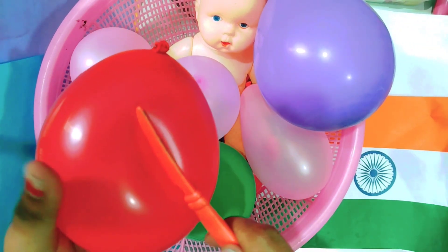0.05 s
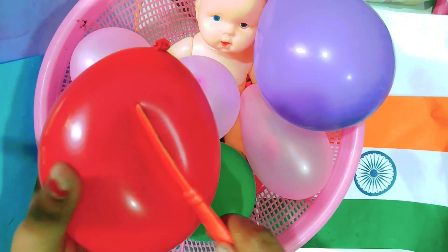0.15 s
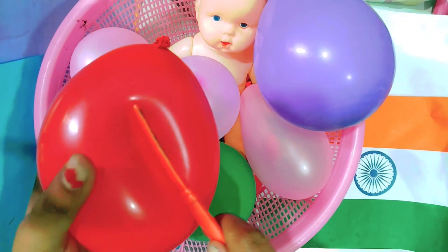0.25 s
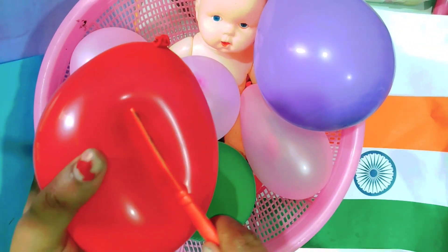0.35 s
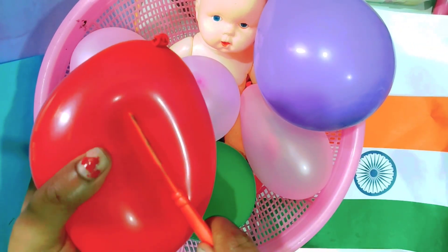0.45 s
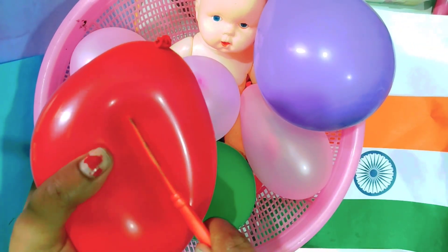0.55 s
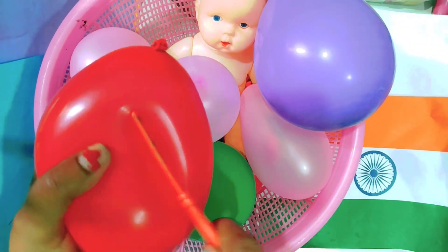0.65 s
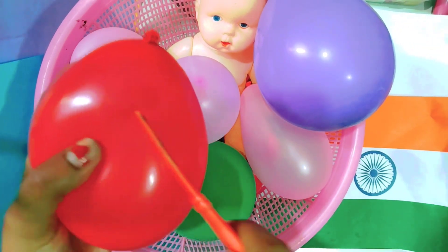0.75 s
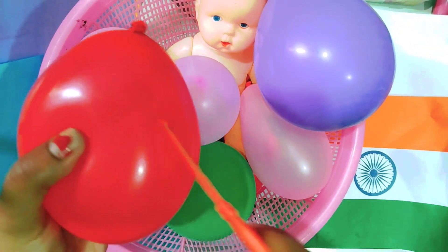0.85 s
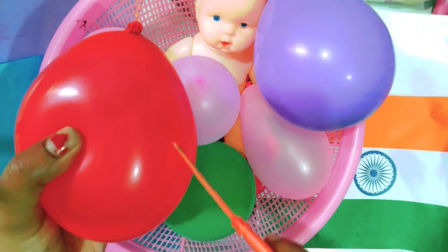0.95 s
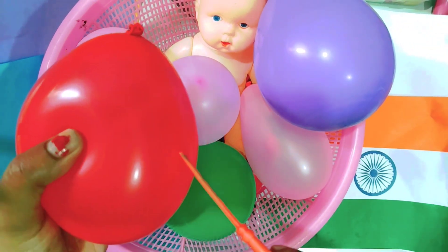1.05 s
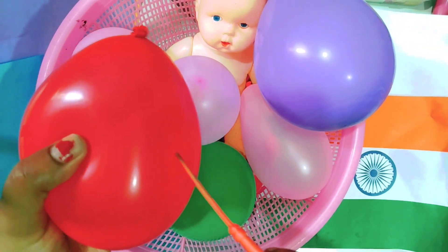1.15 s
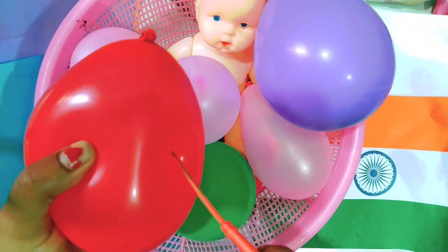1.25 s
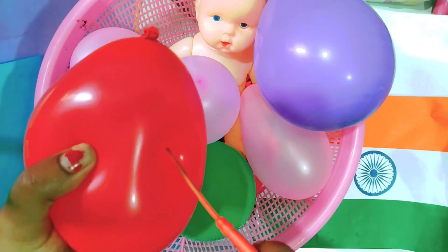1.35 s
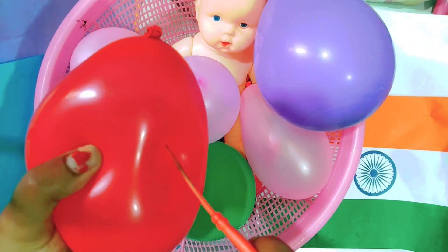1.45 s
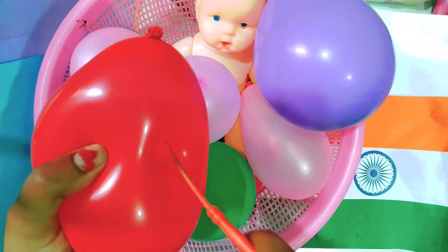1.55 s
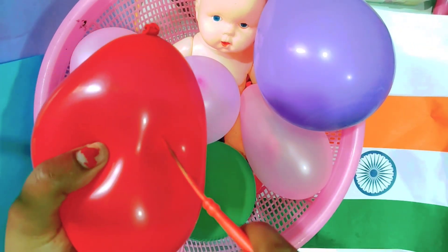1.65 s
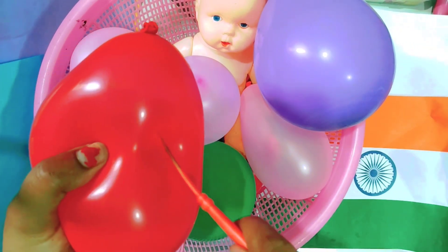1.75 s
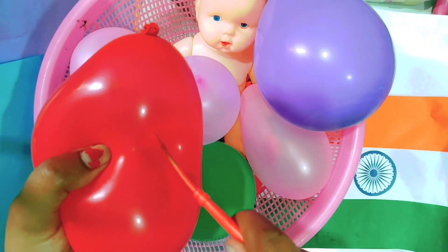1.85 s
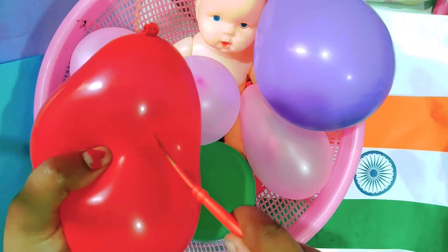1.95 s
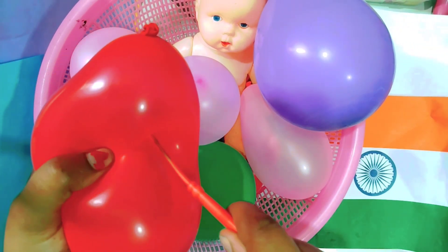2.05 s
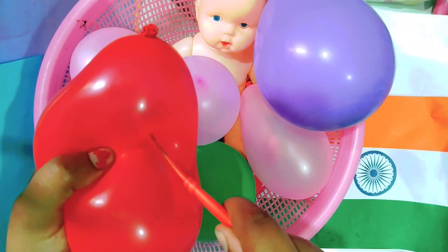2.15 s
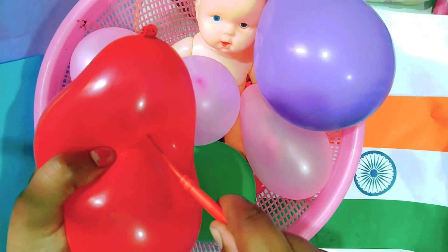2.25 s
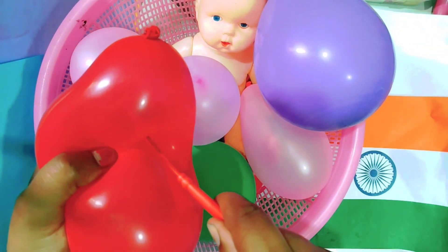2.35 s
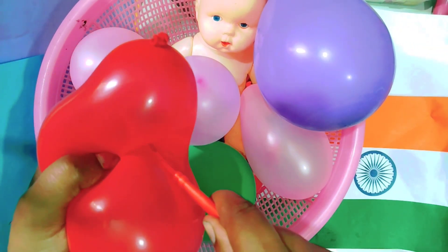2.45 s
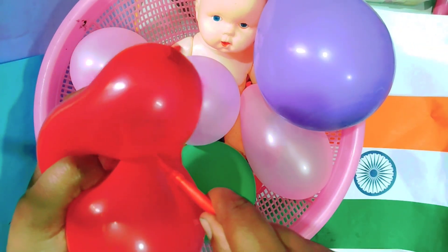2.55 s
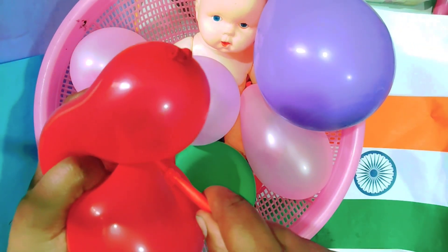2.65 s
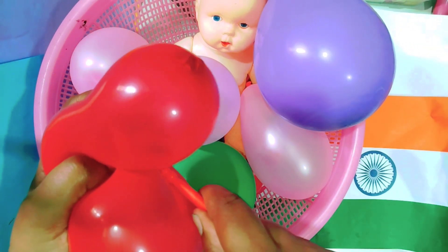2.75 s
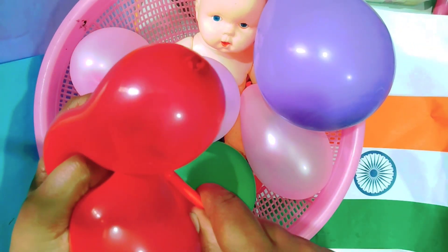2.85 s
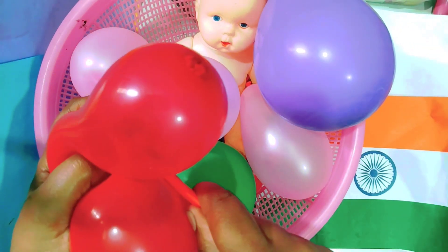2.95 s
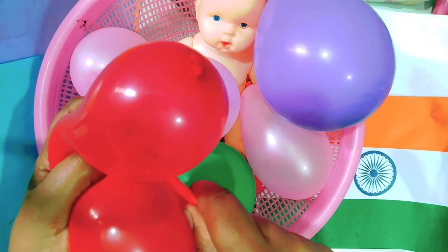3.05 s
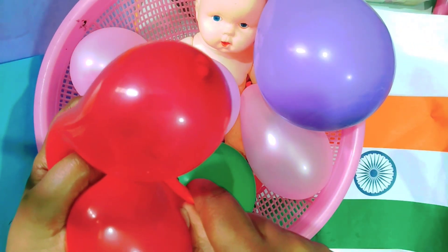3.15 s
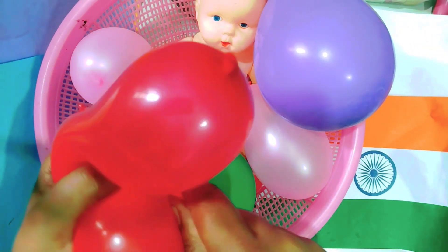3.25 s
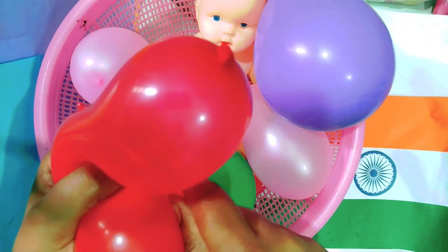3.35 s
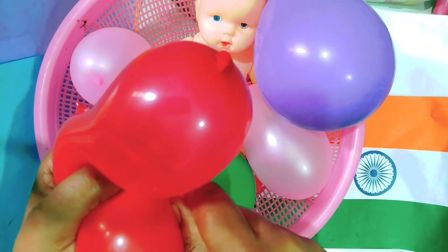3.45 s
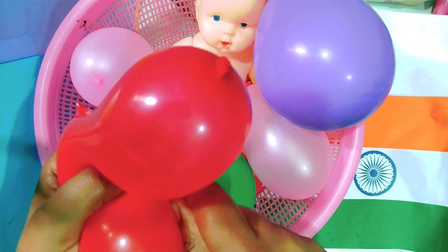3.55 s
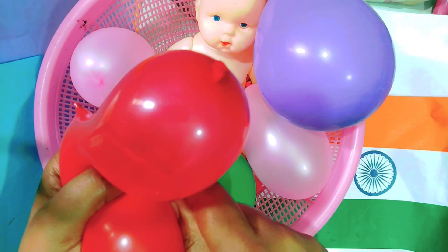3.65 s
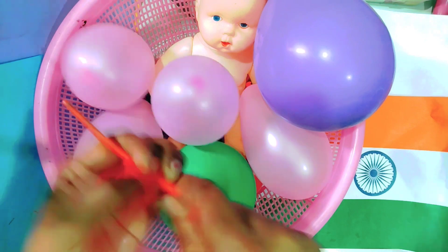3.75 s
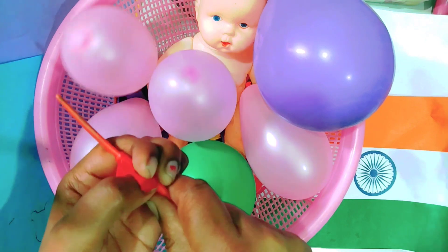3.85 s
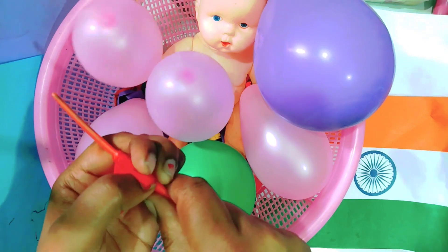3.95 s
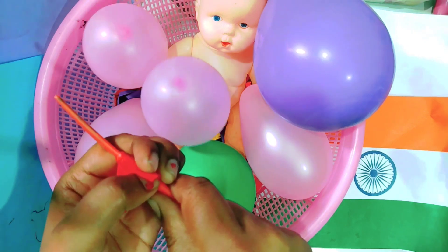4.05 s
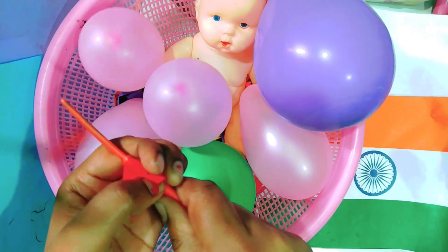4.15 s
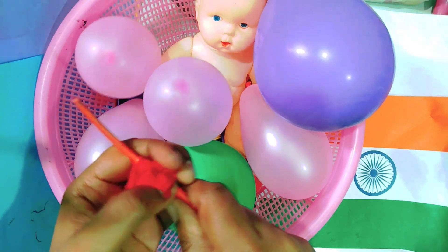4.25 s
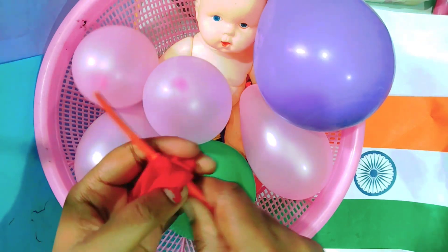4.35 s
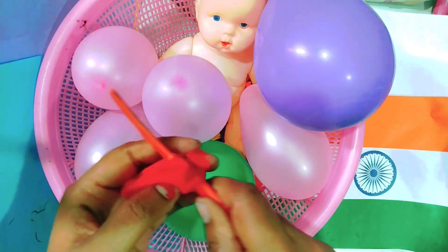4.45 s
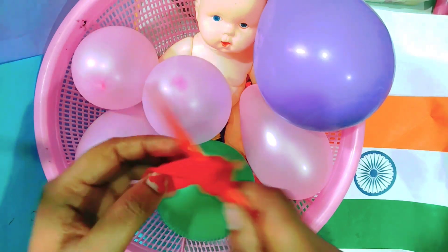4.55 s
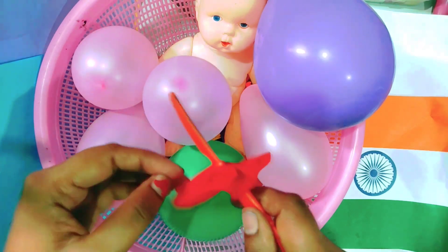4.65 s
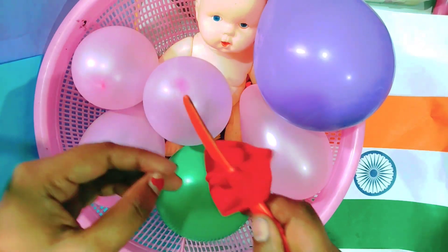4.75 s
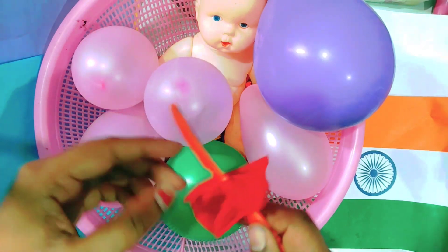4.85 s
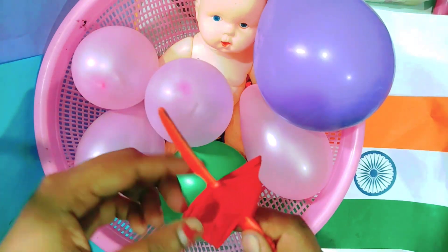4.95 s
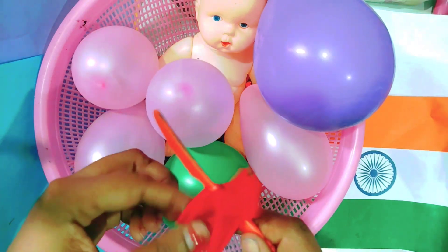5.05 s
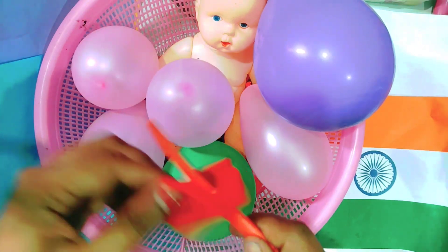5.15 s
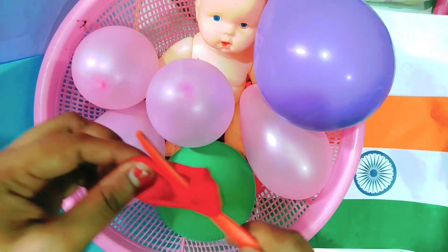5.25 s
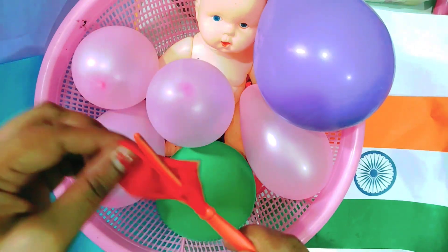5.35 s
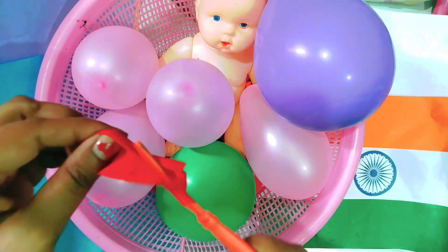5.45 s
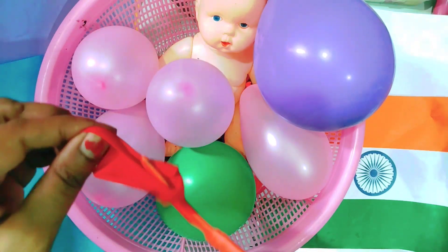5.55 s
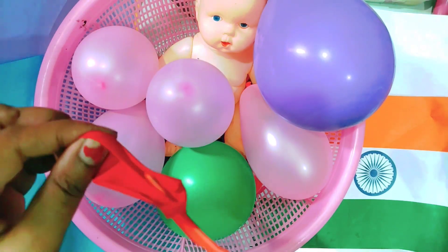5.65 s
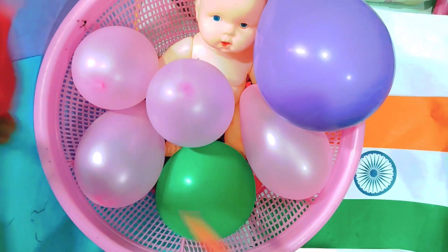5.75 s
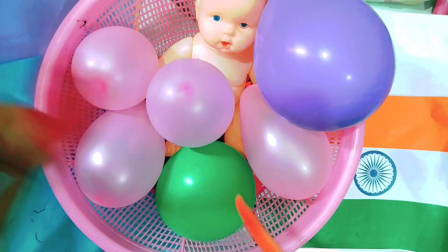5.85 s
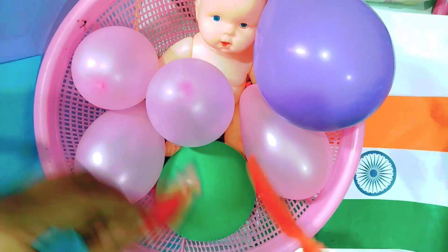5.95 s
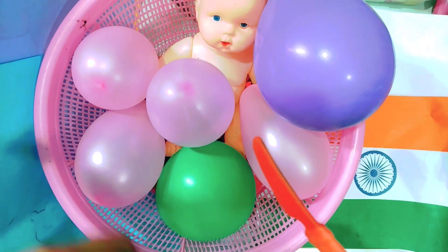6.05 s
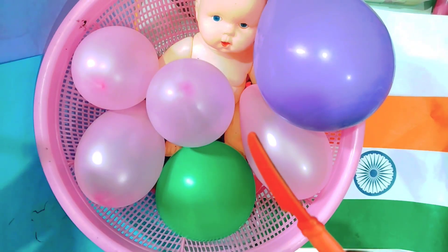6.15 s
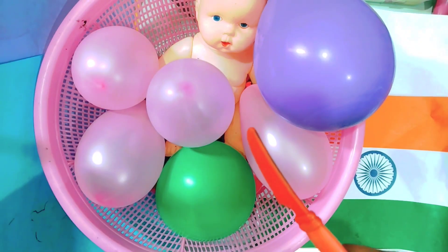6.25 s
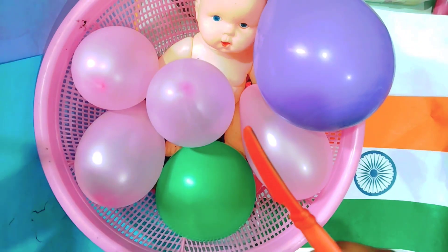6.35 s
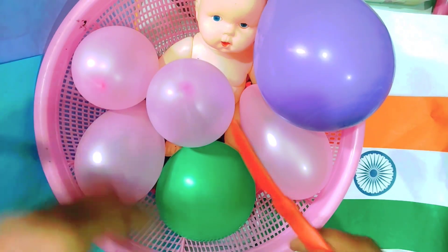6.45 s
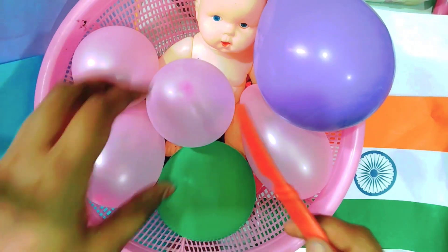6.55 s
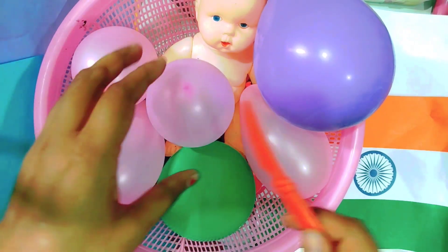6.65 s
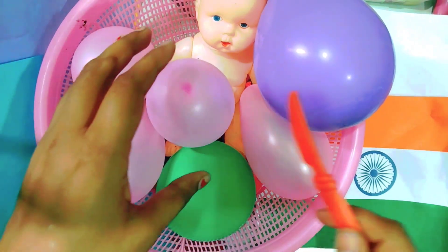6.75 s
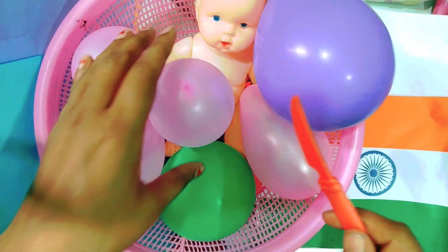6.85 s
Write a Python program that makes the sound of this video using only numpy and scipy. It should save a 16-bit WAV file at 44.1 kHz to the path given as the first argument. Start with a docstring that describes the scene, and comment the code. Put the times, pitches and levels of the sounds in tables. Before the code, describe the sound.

A squeezed rubber balloon creaks and squeaks, is punctured with a sharp crack, hisses for half a second and bursts loudly, then rubber snaps.

```python
"""A squeezed rubber balloon creaks under fingers and a plastic knife, is punctured, hisses and bursts close to a phone.
Creaks are swelling drum notes with plucked skin modes, cracks are coloured noise bursts that ring air and room,
and the leak is shaped noise. The torn rubber then snaps off the blade; hands rub the rubber as grainy noise.
Behind it a wall clock ticks by rattling its case, the room rumbles and faint fluttering tones drift in from far away."""
import sys
import numpy as np
from scipy import signal
from scipy.fft import rfft, irfft, next_fast_len
from scipy.io import wavfile
from scipy.ndimage import uniform_filter1d, map_coordinates

SR = 44100
rng = np.random.default_rng(int(sys.argv[2]) if len(sys.argv) > 2 else 0)


def dump(signal):
    """Clip the signal to [-1, 1] and save it as 16-bit WAV at the path in sys.argv[1]."""
    limited = np.clip(np.atleast_2d(signal).T, -1, 1)
    pcm = np.round(limited * 32767).astype(np.int16)
    wavfile.write(sys.argv[1], SR, pcm)


N = 304738

# Levels are settings ahead of the trims in the functions; spectra are relative, since their noise is levelled later.

# Rumble and house drone over time: (time [s], rumble level [dB], drone level [dB])
AIR_LEVELS = [(0, -53, -44), (.25, -63, -63.5), (.75, -67, -55), (.95, -58, -56), (1.35, -56, -60),
              (1.7, -61.5, -63.5), (2.4, -58.5, -60.5), (2.7, -59.5, -53), (3.3, -68, -45.5),
              (3.6, -78, -62.5), (3.8, -66.5, -85.5), (4.3, -63, -72.5), (4.55, -64.5, -74.5),
              (4.95, -58.5, -76), (5.65, -67.5, -65.5), (6.1, -54.5, -77.5), (6.35, -65.5, -71.5),
              (6.91, -66, -70)]
# Noise spectra of rumble, drone and microphone hiss: (frequency [Hz], relative level per Hz [dB])
RUMBLE_SPECTRUM = [(12, -38.5), (20, -7), (49, 5), (113, -9), (145, -13.5), (160, -15), (210, -39.5),
                   (350, -120)]
DRONE_SPECTRUM = [(59, -32), (100, -6.5), (145, -18.5), (194, -4.5), (230, -8), (360, -7), (590, -22),
                  (699, -17.5), (4000, -41.5), (5200, -70.5), (8800, -120)]
HISS_SPECTRUM = [(880, -34.5), (1500, -7), (1810, -5.5), (3730, -3), (7540, -13.5), (8920, -3.5),
                 (10800, -16.5), (12000, -4.5), (14900, -3), (16000, -9.5)]
# Far tones: (start [s], end [s], frequency [Hz], starting level [dB])
FAR_TONES = [(0.316, 0.585, 1816, -78.5), (0.494, 0.671, 785, -66.5), (0.95, 1.124, 824, -70),
             (1.955, 2.206, 484, -71), (2.013, 2.195, 1120, -80.5), (5.307, 5.627, 756, -65.5),
             (5.333, 5.623, 796, -68), (6.77, 6.912, 780, -75.5), (6.775, 6.91, 468, -79.5)]
TONE_FADE_DB_PER_S = 18

# Clock ticks: (time [s], level [dB])
TICKS = [(0.3275, -42.5), (1.3283, -43.5), (2.3306, -36), (4.327, -50.5), (5.3288, -41), (6.3295, -42.5)]
# Case resonances, before the response is squared: (frequency [Hz], width [Hz], level [dB])
CLOCK_CASE = [(1725, 240, 6.5), (3140, 460, 4), (4840, 1400, 2), (5850, 1100, -1), (7760, 1300, -8.5),
              (9650, 2400, -6.5)]

# Decay and colour of the walls' answer: (frequency [Hz], t60 [s], level [dB])
WALLS = [(100, 0.59, -2), (410, 0.52, -4.5), (1390, 0.33, -3), (2500, 0.42, -2), (4200, 0.335, -1.5),
         (7300, 0.35, -1.5), (14000, 0.14, 5.5)]

# Strokes over the rubber:
# (start [s], strongest [s], end [s], scuff level [dB], swish level [dB], chatter level [dB])
STROKES = [(-.03, 0, 0.023, -43, -64.5, -80), (.04, .09, .24, -49, -66.5, -48.5),
           (0.798, 0.838, 0.92, -57, -75, -55), (.84, 0.898, 1.0, -47, -62.5, -58),
           (1.0, 1.12, 1.3, -59, -77.5, -66), (1.9, 2.01, 2.68, -69.5, -92, -75.5),
           (2.6, 2.645, 2.76, -68, -67, -81), (2.55, 2.984, 3.19, -51.5, -69, -49.5),
           (3.12, 3.237, 3.27, -63, -78, -55), (3.28, 3.33, 3.345, -75, -79.5, -40.5),
           (4.43, 4.46, 4.56, -71.5, -86, -95), (4.55, 4.674, 4.85, -95, -74, -100),
           (4.85, 4.868, 4.89, -84, -79, -100), (5.16, 5.188, 5.25, -71, -56, -96.5),
           (5.24, 5.27, 5.33, -54, -56, -92.5), (5.4, 5.528, 5.7, -71, -76, -93.5),
           (5.7, 5.76, 5.8, -80, -68, -95), (5.777, 5.789, 5.85, -66, -51, -95),
           (6.25, 6.3, 6.35, -80, -67.5, -100), (6.589, 6.625, 6.73, -54, -63, -56)]
STROKE_FADE_DB = 30  # how far under its strongest a stroke starts and ends
# Noise spectra of the dull scuff and the bright swish: (frequency [Hz], relative level per Hz [dB])
SCUFF_SPECTRUM = [(290, -55.5), (500, -29), (661, -8), (1000, -14), (1260, -9), (2000, -18), (5000, -24),
                  (6500, -54.5), (11000, -120)]
SWISH_SPECTRUM = [(1760, -36), (3000, -7.5), (3790, -14.5), (4000, -7.5), (7430, -4.5), (9260, 3.5),
                  (11400, -12.5), (15500, -10)]

# Air jet at the puncture: (time [s], level [dB])
LEAK_LEVELS = [(3.345, -61.5), (3.36, -40.5), (3.40, -37), (3.42, -32), (3.6, -31.5), (3.86, -34),
               (3.875, -70.5)]
# Jet noise spectrum: (frequency [Hz], relative level per Hz [dB])
JET_SPECTRUM = [(88, -70), (150, -39.5), (201, -27), (280, -18), (315, -40.5), (414, -16.5), (504, -27.5),
                (821, -2), (1060, -15), (1940, -10.5), (2140, -12.5), (4160, -11.5), (6140, -16),
                (15100, -11.5), (16000, -20.5)]
# Left-right likeness of the jet: (frequency [Hz], correlation [-1 to 1])
JET_LIKENESS = [(60, 0.52), (240, 0.4), (950, 0.35), (3770, 0.25), (15000, 0.75)]
# Fingertip squeal: (time [s], frequency [Hz], level [dB])
SQUEAL = [(2.925, 5200, -52.5), (2.94, 5970, -57), (2.96, 6670, -56), (3.0, 7900, -66), (3.03, 8700, -66),
          (3.05, 8500, -66)]

# Slips of skin or blade on the taut rubber:
# (time [s], drum level [dB], drum note [Hz], scrape over drum [dB], left over right [dB])
CREAKS = [(0.0593, -27, 314.6, -22.5, -12), (0.061, -36, 155, -34, -16.5), (0.0666, -26, 277.4, -15, -8.5),
          (0.0794, -32, 288.6, -10.5, -17), (0.0969, -27.5, 252.6, -13.5, -2.5),
          (0.1154, -35.5, 305.7, -21.5, -21), (0.109, -37, 159.3, -33, -9), (0.1438, -46, 298, -9, -9),
          (0.601, -51.5, 232, -6, 2), (0.6104, -47, 317, -16, -13.5), (0.6228, -34.5, 291, -25, -6.5),
          (0.7722, -51.5, 249, -18.5, -2), (0.8073, -42, 250, -7, -1.5), (0.8339, -42.5, 290, -5, -14),
          (0.86, -49, 147.4, -10.5, 3), (0.8858, -48, 315, -11, 8), (1.0645, -43.5, 318, -16, -5),
          (1.0944, -45, 298, -12, -1.5), (2.005, -55.5, 295, -10, -6), (2.3449, -51.5, 331, 8, -9.5),
          (2.4686, -54, 310, -24, -6), (2.5198, -49, 318, -8.5, -3), (2.5591, -46.5, 298, -24, -5),
          (2.5712, -43, 294, -17, -4.5), (2.6441, -53, 257, 8.5, 0.5), (2.6741, -47.5, 305, -6, -7),
          (2.7225, -45.5, 334, -14, -5.5), (2.7518, -44, 323, -18.5, -2.5), (2.7663, -35, 301, -6.5, -2.5),
          (2.7865, -37, 299, -9.5, -4), (2.811, -38, 288.5, -4.5, -3), (2.829, -34.5, 326, -6.5, -1.5),
          (2.8504, -34.5, 293, -3, -1.5), (2.8809, -37.5, 295, 4, 0), (2.9126, -32.5, 293, -5, -1.5),
          (2.9351, -45.5, 310, 5, -7.5), (2.9554, -33, 331, -2, 2.5), (2.9686, -34.5, 307, -0.5, -11),
          (2.9894, -35, 326, -7, -1.5), (3.015, -35, 355, -5.5, 3), (3.0363, -35.5, 277, -2, -8.5),
          (3.0449, -39.5, 256, -11.5, 11), (3.0868, -42, 339.6, 4, -3.5), (3.1105, -45, 249, 5, -5),
          (3.1478, -36.5, 339, 1, 9), (3.1989, -43.5, 272, 1.5, -3.5), (3.2154, -42.5, 253, 2, -3.5),
          (3.306, -35.5, 240, -14.5, -3.5), (3.846, -32.5, 242.6, -20, 2)]
# How the grip colours the slips: (time [s], overtones over drum [dB], treble over scrape [dB])
GRIP = [(.05, -1, -5.5), (.62, -5, -21.5), (.87, -5, -3.5), (1.1, -16, -7), (2.3, -12, -7),
        (2.8, -9.5, -21.5), (2.93, -11.5, -7.5), (3.03, -6.5, -8), (3.1, -9, -14.5), (3.22, -6, -20.5)]
# Overtones of the drum note: (frequency [multiple of the note], level [dB])
OVERTONES = [(2.049, -4), (3.099, -8.5), (4.099, -11.5)]
# Upper modes of the balloon skin, nominal: (frequency [Hz], t60 [s], level [dB])
SKIN_MODES = [(950, .03, -9), (1250, .03, -8), (1540, .03, 0), (1720, .03, -7), (2300, .025, -7),
              (2800, .025, -4), (3350, .02, -10), (4400, .015, -12)]
SWELL_CYCLES = 2.2  # rise of a slip's drum note, in cycles

# Sharp cracks of rubber: (time [s], level [dB], body [dB], treble [dB], t60 [s], left over right [dB],
# room [dB], ring level [dB], ring tilt [dB/octave], ring length [0 to 1], boom level [dB])
SNAPS = [(3.2326, -41, -0.5, -16.5, .014, 0, -8.5, -60.5, 0, .5, -71.5),
         (3.3315, -43.5, 7, -6, .02, -4, -7, -30, 7.5, .5, -60.5),
         (3.3381, -8, -2, -12, .02, 7, -6.5, -2.5, 0, .95, -25),
         (3.4085, -14, 4, -7.5, .021, -3, -6, -17, 10, .75, -49.5),
         (3.86, -40.5, 8, -4.5, .02, -1, -6, -23.5, 1.5, .3, -30.5),
         (3.8673, -9, -5, -7.5, .0091, -12.5, 3, -14.5, -2, 0.7, 1),
         (4.2867, -43, 4.5, -6.5, .018, 5, -5.5, -34.5, 7, 0.32, -63),
         (5.3008, -27, -10, -3, .018, 1.5, -10.5, -45, -4.5, 0.6, -47),
         (5.6256, -54, -3, 7, .016, -2.5, -7.5, -59, -1, .4, -75.5),
         (5.8094, -21, -4.5, 9.5, .014, 5.5, -10.5, -39, -2, .3, -34),
         (5.812, -14.5, -8, 0, .017, 2.5, -14, -15.5, -4.5, 0.18, -51.5),
         (6.0203, -67.5, -12, 9.5, .013, -4, -17.5, -88, 0, .3, -85),
         (6.6118, -49.5, -4, -8.5, .013, 8, 9, -71, 4, 0.4, -74.5),
         (6.6248, -30, -5.5, -20, .012, -1.5, -15, -33.5, -19, 0.19, -64.5),
         (6.6465, -59, 2, 2, .014, -7, -11, -70, -1.5, .3, -80)]
# Colour of a crack: (frequency [Hz], level [dB], share of body [ratio], share of treble [ratio])
CRACK_COLOUR = [(250, -0.5, 0.58, 0), (900, 5, 1.35, 0), (1720, 6.5, 1.3, 0.5), (3000, 0, 0, 0),
                (5860, -4, 0, 0.99), (11000, -4, 0.5, 1.24)]
# Air inside the balloons, lowest mode first, before each crack's ring length:
# (frequency [Hz], level [dB], t60 [s])
HOLLOW_MODES = [(262.9, 1, 0.12), (350, -8.5, .1), (494, -7.5, .11), (627, -16.5, .05), (812, -6.5, 0.1),
                (1336, -14, 0.037), (1560, -8.5, 0.041), (1975, -18.5, .05)]
# Low modes of the room: (frequency [Hz], level [dB], t60 [s])
ROOM_MODES = [(67, 1, 0.077), (110.4, -19, 0.64), (135.5, -18, 0.41), (163.7, -18.5, 0.24), (198, -13, .17)]
# The blade flicking free: (frequency [Hz], level [dB], t60 [s])
BLADE_TONE = (4720, -14.5, 0.012)
BLADE_S, BOOM_DELAY_S = 5.301, -.001

TREBLE_FADE_FROM_HZ = 15200


def amp(db):
    """Gain for a level in dB."""
    return 10 ** (np.asarray(db) / 20)


def unit(x):
    """Levels x to an rms of 1."""
    return x / np.sqrt(np.mean(x ** 2) + 1e-20)


def along(points, hz):
    """Reads (frequency, value) points on a log frequency axis."""
    f, v = np.transpose(points)
    return np.interp(np.log(hz + 1), np.log(f + 1), v)


def curves(rows):
    """One value per sample for each column after the time."""
    s, *cols = np.transpose(rows)
    return [np.interp(np.arange(N) / SR, s, c) for c in cols]


def gated(rows):
    """A soft-edged gate, open between the first and last time of a table."""
    t = np.arange(N) / SR
    is_open = (t > rows[0][0]) & (t < rows[-1][0])
    return uniform_filter1d(1. * is_open, size=600)


def wobble(rate):
    """A smooth random curve, rate knots a second."""
    knots = rng.standard_normal(int(N * rate / SR) + 4)
    return map_coordinates(knots, [np.arange(N) * rate / SR])


def filtered(x, response):
    """Filters x by a complex response of frequency."""
    m = next_fast_len(x.shape[-1] + 4096)
    spectrum = rfft(x, m) * response(np.fft.rfftfreq(m, 1 / SR))
    return irfft(spectrum, m)[..., :x.shape[-1]]


def resonances(peaks, order=1):
    """Causal response of (Hz, width, dB) modes of alternating sign; order 2 squares it and darkens the valleys."""
    def response(f):
        modes = [amp(db) * 1j * f * w / (c * c - f * f + 1j * f * w) for c, w, db in peaks]
        return sum((-1) ** k * mode for k, mode in enumerate(modes)) ** order
    return response


def rush(spectrum, alike, patchy_db):
    """Stereo noise of rms 1 with patches of random gain over time and frequency."""
    z = signal.stft(rng.standard_normal((2, N)), nperseg=512)[2]
    field = uniform_filter1d(rng.standard_normal(z.shape[1:]), size=6, axis=0)
    field = uniform_filter1d(field, size=10, axis=1)
    pair = signal.istft(z * amp(patchy_db * unit(field)), nperseg=512)[1][:, :N]

    def mid_side(hz):
        # the balance of mid and side sets the left-right correlation
        turn = np.arccos(np.clip(along(alike, hz), -1, 1)) / 2
        return amp(along(spectrum, hz)) * [np.cos(turn), np.sin(turn)]
    mid, side = filtered(pair, mid_side)
    return unit(np.array([mid + side, mid - side]))


def add(out, s, sound, pan_db, room_db, lag=0.00021, colour=None):
    """Places a near sound, later at the left port for a positive lag, and the walls' answer, swelling after a gap.
    With a colour the walls answer a smooth click of that colour."""
    hz, t, z = signal.stft(rng.standard_normal((2, SR // 2)), SR, nperseg=256)
    walls = np.array(WALLS)
    t60 = along(walls[:, :2], hz)[:, None]
    wall_db = along(walls[:, ::2], hz)[:, None]
    swell = np.clip((t - .005) / 0.011, 0, 1)
    tail = signal.istft(z * swell * amp(wall_db - 60 * t / t60), SR, nperseg=256)[1]
    tail = amp(room_db) * tail / np.linalg.norm(tail[0])
    sound = sound * amp([[pan_db / 2], [-pan_db / 2]])
    if colour:
        level = np.linalg.norm(tail) * np.linalg.norm(sound) / np.sqrt(4 * tail.shape[1])
        both = unit(filtered(tail, colour)) * level
    else:
        both = signal.fftconvolve(sound.mean(axis=0)[None], tail, axes=1)
    both[:, :sound.shape[1]] += sound
    for port, row, delay in zip(out, both, (lag / 2, -lag / 2)):
        k = round((s + delay) * SR)
        port[k:k + len(row)] += row[:N - k]


def air():
    """Lumpy rumble at the ports, the drone of the house and the microphone's own hiss, all shaped noise."""
    rumble_db, drone_db = curves(AIR_LEVELS)
    left_louder = amp([[2.5], [-2.5]])
    lumps = amp(3 * np.array([wobble(5.8), wobble(9)]) + 2.5 * wobble(4))
    rumble = unit(lumps * rush(RUMBLE_SPECTRUM, [(60, 0.37)], patchy_db=-0.5))
    rumble = amp(rumble_db + 2.5) * left_louder * rumble
    drone = rush(DRONE_SPECTRUM, [(130, .5), (600, -0.47), (3000, .2)], patchy_db=4.5)
    drone = amp(drone_db + 1.3 * wobble(7)) * drone
    hiss = amp(-79) * left_louder * rush(HISS_SPECTRUM, [(3000, .05)], patchy_db=0.0)
    return rumble + drone + hiss


def tones():
    """Far tones made fuzzy by random flutter in level and waver in phase, different at each port."""
    out, t = np.zeros((2, N)), np.arange(N) / SR
    for s0, s1, hz, db in FAR_TONES:
        on = np.clip(np.minimum(t - s0, s1 - t) / 0.01, 0, 1)
        fade_db = TONE_FADE_DB_PER_S * (t - s0) * on
        for port in out:
            flutter_db, waver = 3.5 * wobble(40), 1.1 * wobble(45)
            port += on * amp(db + 7.5 + flutter_db - fade_db) * np.sin(2 * np.pi * hz * t + waver)
    return out


def clock():
    """Each tick of the movement is a short noise rattle that rings the case and the walls."""
    out, t = np.zeros((2, N)), np.arange(SR // 8) / SR
    case = resonances(CLOCK_CASE, order=2)
    for s, db in TICKS:
        rattle = rng.standard_normal((2, len(t))) * t / .007 * np.exp(-t / 0.014)
        tick = amp(db - 17.5) * unit(filtered(rattle, case))
        add(out, s - .005, tick, pan_db=3.0, room_db=-6.5, colour=case)
    return out


def strokes():
    """Gains of scuff, swish and chatter: each stroke rises to its strongest moment and fades."""
    t, out = np.arange(N) / SR, np.zeros((3, N))
    for s0, s1, s2, *dbs in STROKES:
        shape_db = np.interp(t, np.sort([s0, s1, s2]), [-STROKE_FADE_DB, 0, -STROKE_FADE_DB], -200, -200)
        out += amp(dbs)[:, None] * amp(shape_db)
    return out


def rubbing():
    """Hands slide over rubber: grainy noise, a dull scuff and a bright swish."""
    scuff = rush(SCUFF_SPECTRUM, [(1000, 0.22)], patchy_db=6.5)
    swish = rush(SWISH_SPECTRUM, [(5000, 0.12)], patchy_db=0.5)
    dull, bright, _ = strokes()
    grain = amp(5 * wobble(110))
    return grain * (amp(-7.0) * dull * scuff + amp(3.0) * bright * swish)


def chatter():
    """Tiny slips of scattered size ring the skin modes and one broad mode below them."""
    # about 300 slips a second are common to both ports, and as many again are each port's own
    common = (rng.random(N) < 300 / SR) * rng.standard_normal(N) * [[1], [1]]
    own = (rng.random((2, N)) < 300 / SR) * rng.standard_normal((2, N))
    body = resonances([(580, 380, 1.7)] + [(f, 3.2 / t60, db) for f, t60, db in SKIN_MODES])
    return strokes()[2] * unit(filtered(common + own, body))


def leak():
    """Air jets through the puncture as noise coloured by the cavity; before it a fingertip squeals upward."""
    jet_gain = amp(curves(LEAK_LEVELS)[0] + 0.65 * wobble(30)) * gated(LEAK_LEVELS)
    jet = jet_gain * rush(JET_SPECTRUM, JET_LIKENESS, patchy_db=1.5)
    hz, db = curves(SQUEAL)
    squeal_gain = gated(SQUEAL) * amp(db - 0.5 + 4 * wobble(90))
    cycles = np.cumsum(hz * (1 + 0.0064 * wobble(450))) / SR
    return jet + squeal_gain * np.sin(2 * np.pi * cycles)


def creaks():
    """Each slip swells the balloon's drum note and its overtones, and plucks the upper modes."""
    out, t = np.zeros((2, N)), np.arange(SR // 8) / SR
    grip_s, overs_db, trebles_db = np.transpose(GRIP)
    for s, drum_db, hz, bright_db, pan_db in CREAKS:
        scrape_db = drum_db + bright_db
        u = t * hz / SWELL_CYCLES  # the drum note peaks at u = 1
        drum = amp(drum_db + 4.5) * (u * np.exp(1 - u)) ** 2 * np.sin(2 * np.pi * hz * t)

        over = sum(amp(db + rng.normal(0, 1.0)) * np.sin(2 * np.pi * (k * hz * t + rng.random()))
                   for k, db in OVERTONES)
        over_swell = (1.19 * u * np.exp(1 - 1.267 * u)) ** 2
        over = amp(drum_db + np.interp(s, grip_s, overs_db)) * over_swell * over

        # every slip finds the modes at new strengths, a little detuned, in another phase at each port
        pluck = 0
        for f, t60, db in SKIN_MODES:
            decay = amp(db + rng.normal(0, 3) - 60 * t / t60)
            detuned_hz = f * rng.normal(1, .025)
            pluck = pluck + decay * np.sin(2 * np.pi * detuned_hz * t + rng.normal(0, .9, (2, 1)))
        scrape = amp(scrape_db + 4.0) * pluck * (1 - np.exp(-t / 0.0033))

        # the slip itself is a brief hiss
        burst = rng.standard_normal((2, len(t))) * 2.5 * u * np.exp(-3.5 * u)
        treble_gain = amp(scrape_db + np.interp(s, grip_s, trebles_db))
        treble, middle = resonances([(7000, 8000, 0)]), resonances([(2200, 2500, 0)])
        hiss = filtered(burst, lambda f: treble_gain * treble(f) + amp(scrape_db - 1.0) * middle(f))
        add(out, s - .0015, drum + over + scrape + hiss, pan_db, room_db=-12)
    return out


def ring(hz, db, t60, rough):
    """A damped tone whose phase wanders more and more."""
    t = np.arange(SR // 2) / SR
    drift = np.cumsum(rng.standard_normal(len(t))) * rough * np.minimum(t / 0.079, 1)
    envelope = amp(db - 60 * t / t60) * (1 - np.exp(-t * hz * 1.5))
    return -np.sin(2 * np.pi * hz * t + drift) * envelope


def rings():
    """Every crack rings the balloons' air, stronger at the left port, and the room's low modes, stronger at the
    right; the blade rings once."""
    out = np.zeros((2, N))
    air_rough, solid_rough = .022, .035  # phase wander [rad a sample, once grown]
    lowest_hz = HOLLOW_MODES[0][0]
    for s, *_, ring_db, tilt_db, length, boom_db in SNAPS:
        hollow = sum(ring(hz, ring_db + db + tilt_db * np.log2(hz / lowest_hz), length * t60, air_rough)
                     for hz, db, t60 in HOLLOW_MODES)
        add(out, s + 0.0013, hollow, pan_db=6.0, room_db=-12, lag=.0008)
        boom = sum(ring(hz, boom_db + db, t60, solid_rough) for hz, db, t60 in ROOM_MODES)
        add(out, s + BOOM_DELAY_S, boom, pan_db=-5, room_db=-10.0, lag=-.0015)
    blade_colour = resonances([(BLADE_TONE[0], 900, 0)])
    add(out, BLADE_S, ring(*BLADE_TONE, solid_rough), pan_db=3.0, room_db=-15, colour=blade_colour)
    return out


def snaps():
    """Milliseconds of noise, coloured by how the rubber lets go; the ports share part of it."""
    out, t = np.zeros((2, N)), np.arange(SR // 16) / SR
    late = np.maximum(t - .002, 0)  # the burst starts 2 ms in
    for s, db, body_db, treble_db, t60, pan_db, room_db, *_ in SNAPS:
        points = [(hz, db + tint_db + low * body_db + high * treble_db)
                  for hz, tint_db, low, high in CRACK_COLOUR]
        colour = lambda hz: amp(along(points, hz) + 12.0)
        noise = rng.standard_normal((3, len(t)))
        envelope = np.minimum(late / 0.00033, 1) * amp(-60 * late / max(t60, .002))
        burst = (0.73 * noise[0] + 1.4 * noise[1:]) * envelope
        add(out, s - .002, filtered(burst, colour), pan_db, room_db, lag=.00025, colour=colour)
    return out


def scene():
    """Sums the layers, from the background to the balloon."""
    background = air() + tones() + clock()
    handling = rubbing() + chatter()
    return background + handling + leak() + creaks() + rings() + snaps()


def record(dry):
    """The loudest peaks flatten softly near full scale; the top treble fades to nothing within 900 Hz."""
    x = dry / (1 + np.abs(dry / 1.05) ** 6) ** (1 / 6)
    return filtered(x, lambda hz: np.cos(np.pi / 2 * np.clip((hz - TREBLE_FADE_FROM_HZ) / 900, 0, 1)) ** 4)


dry = scene()
out = record(dry)
dump(out)
```